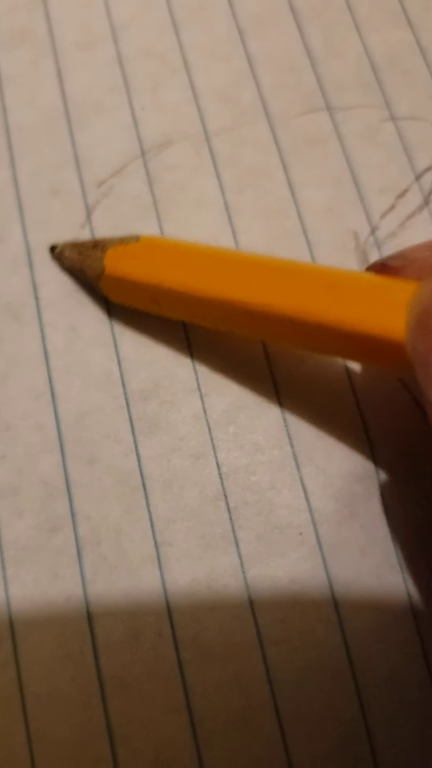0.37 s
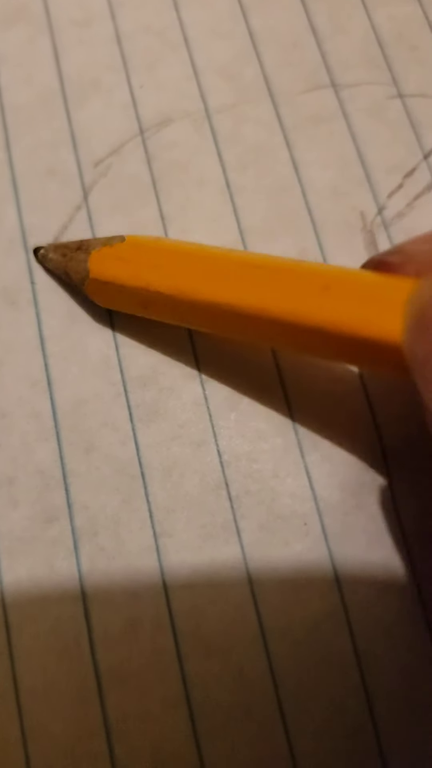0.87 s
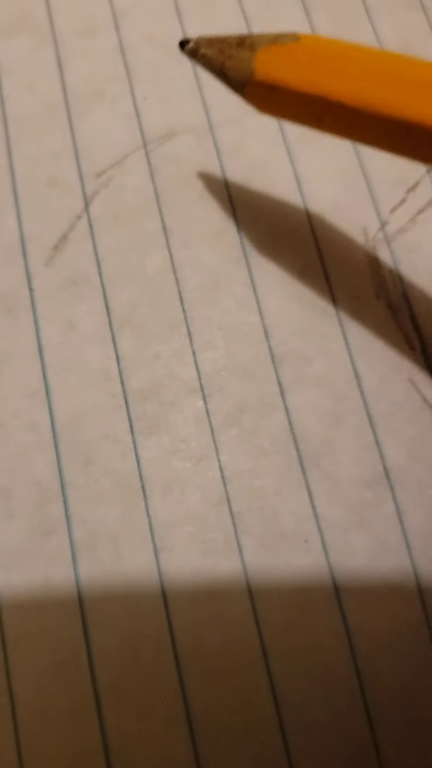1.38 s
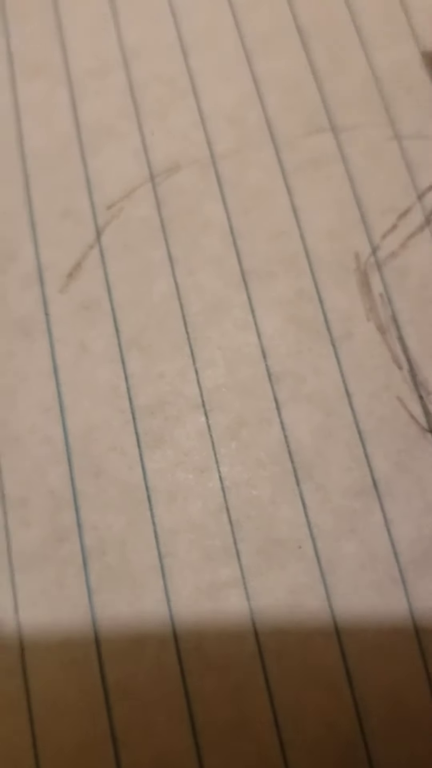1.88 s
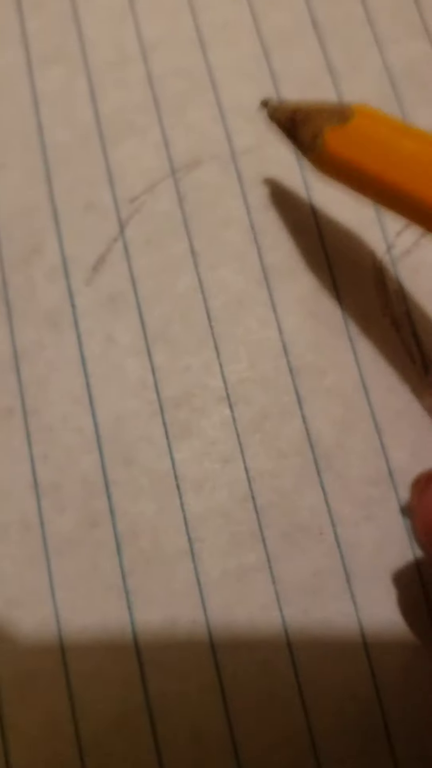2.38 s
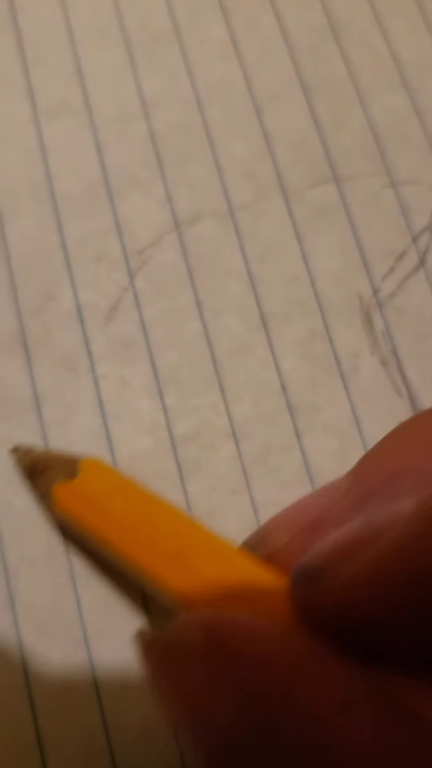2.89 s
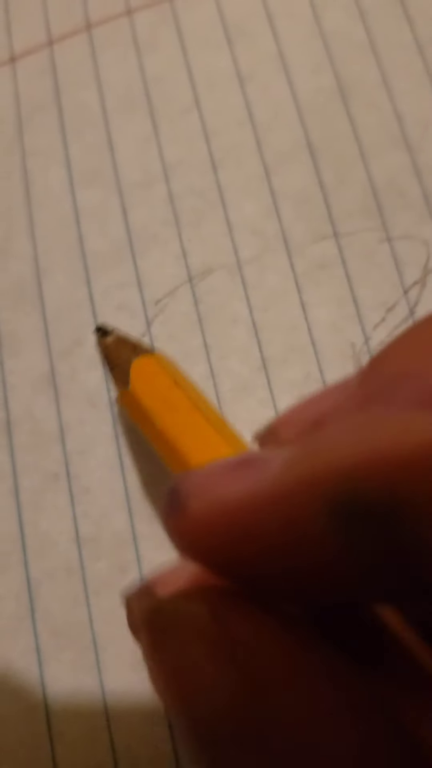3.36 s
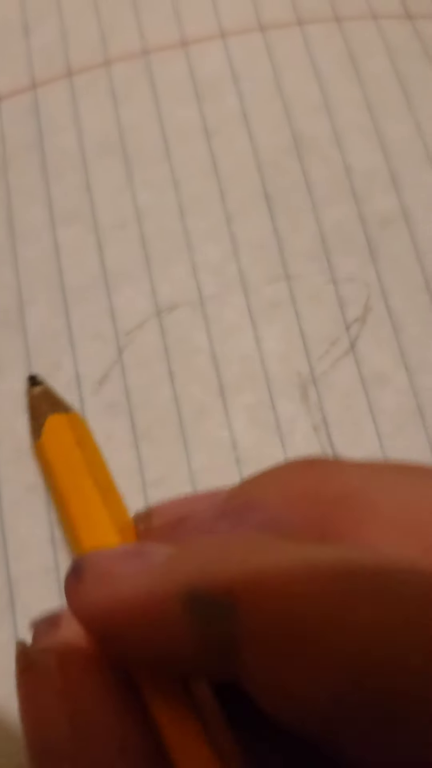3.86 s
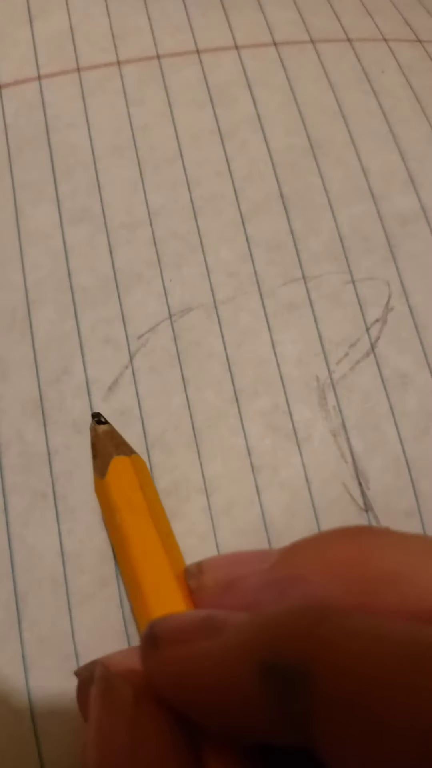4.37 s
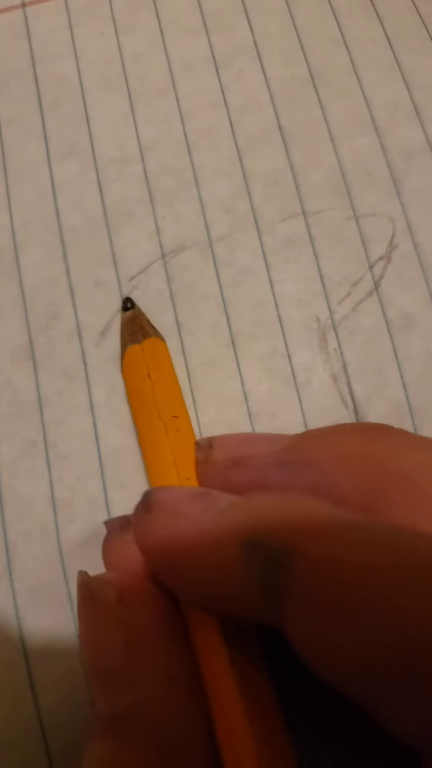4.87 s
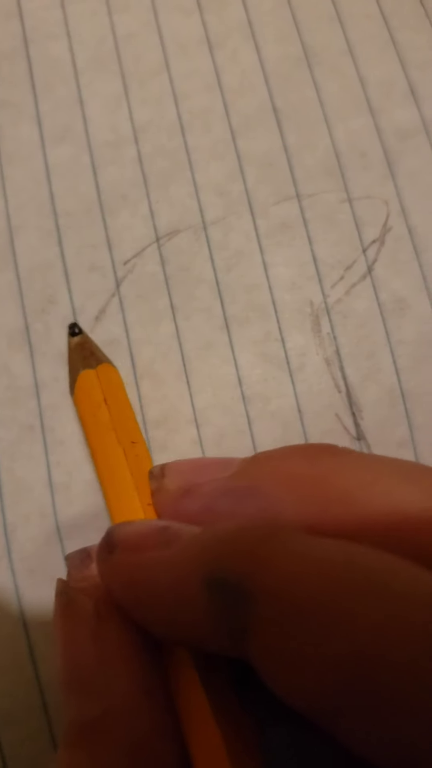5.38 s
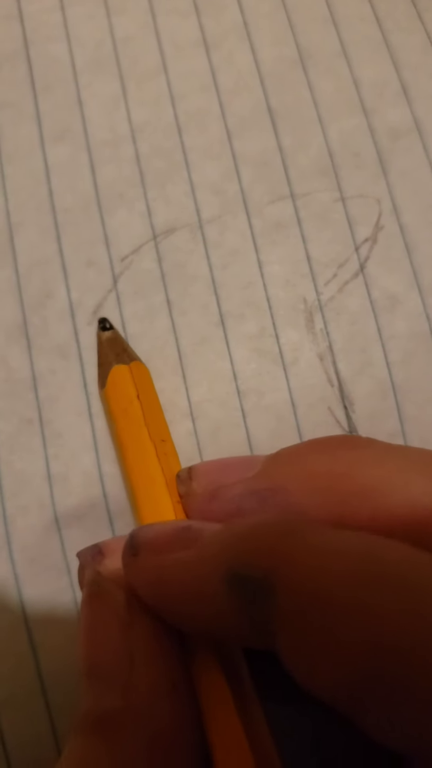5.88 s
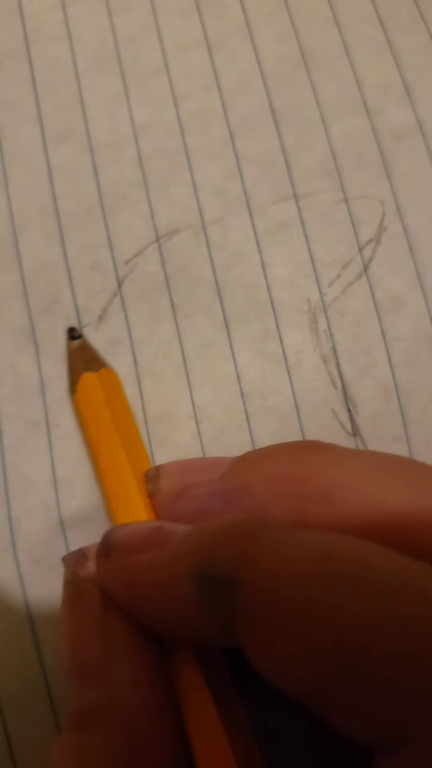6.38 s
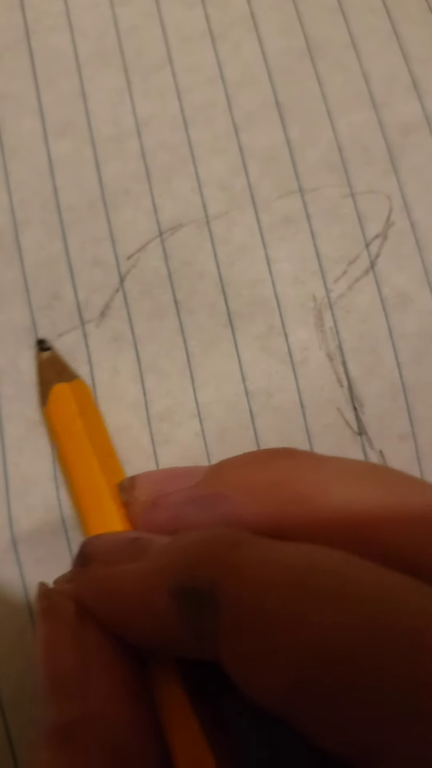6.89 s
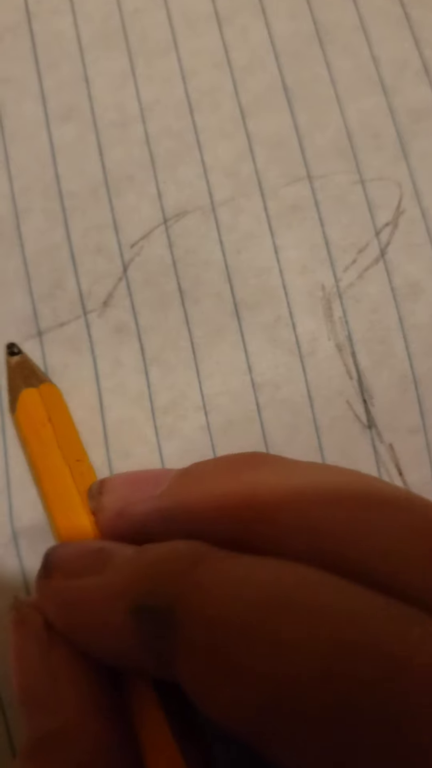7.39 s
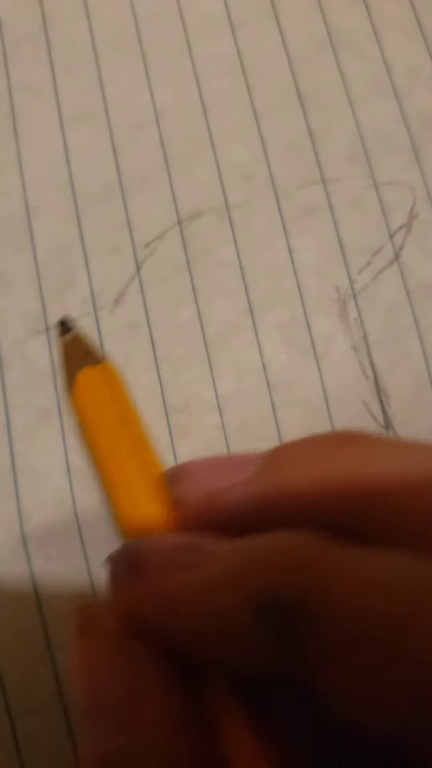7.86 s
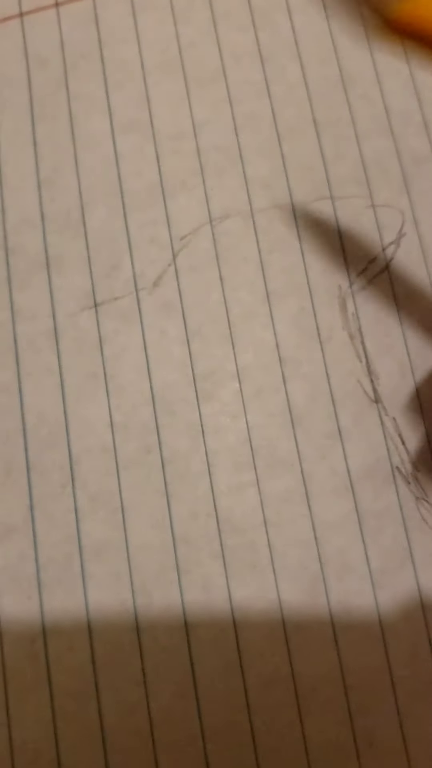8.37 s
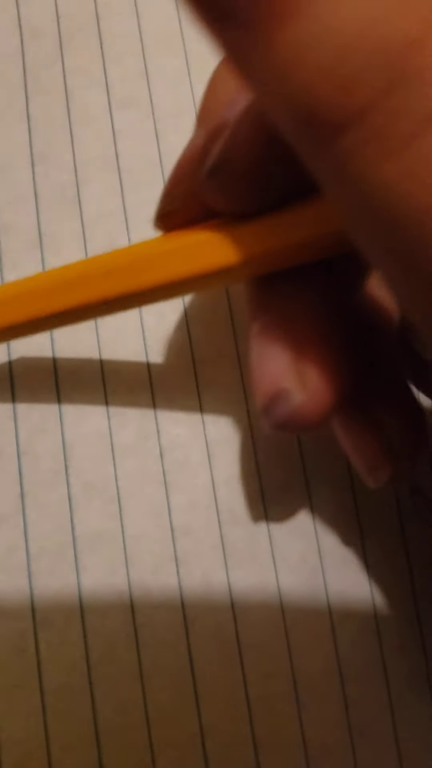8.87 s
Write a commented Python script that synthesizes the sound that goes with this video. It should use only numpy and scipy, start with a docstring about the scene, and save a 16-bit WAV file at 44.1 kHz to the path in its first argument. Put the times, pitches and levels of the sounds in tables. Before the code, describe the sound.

In a quiet indoor room, rapid dry pencil strokes give way to sparse light brushing and little wooden taps. A burst of hollow knocks and creaking from the hand regripping the phone stands out far louder than the writing. Near silence follows, then another run of brisk scratches, a hard pencil tick, and a few faint hand rustles. Close, handheld stereo pickup, leaning left, with soft low background rumble.

```python
"""A wooden pencil draws short, quick strokes on notebook paper (bursts of tiny clicks), then lighter ones.
From about 3.2 to 4.6 s fingers shift their grip on a phone case: knocks and creaks set its parts ringing,
mostly near the left of two unlike microphones. Firmer strokes return from about 6 s, and a sharp tick falls
at 8 s. The point ticks on the pad now and then (short contacts ring the wood); shaped noise
makes the quiet rumble of the room throughout."""
import sys
import numpy as np
from scipy import signal
from scipy.fft import rfft, irfft
from scipy.io import wavfile

SR = 44100
rng = np.random.default_rng(int(sys.argv[2]) if len(sys.argv) > 2 else 0)


def put_to_file(sound):
    """Save the sound as 16-bit audio at rate SR, in the file named by the first command-line argument."""
    columns = np.atleast_2d(sound).T  # one column per channel
    safe = np.clip(columns, -1, 1)
    whole_steps = np.round(safe * 32767)
    wavfile.write(sys.argv[1], SR, whole_steps.astype(np.int16))


def ratio(d):
    """dB to gain"""
    e = np.asarray(d, float) / 20
    return 10 ** e


N = 407925
REGRIP_S = 3.7   # the phone is held anew, which changes its ringing and the path from the page


def rms_one(x):
    """Scales a sound to an rms level of 1."""
    return x / np.sqrt(np.mean(x ** 2) + 1e-20)


def at_hz(points, column=1):
    """Reads a spectrum table at every frequency of the whole-length transform."""
    hz = np.maximum(np.arange(N // 2 + 1) * SR / N, 1)
    points = np.array(points)
    return np.interp(np.log(hz), np.log(points[:, 0]), points[:, column])


def drift(rate_hz):
    """Slow random wandering with spread 1, made at every 40th sample and joined by lines."""
    r = np.exp(-80 * np.pi * rate_hz / SR)
    noise = rng.standard_normal(N // 40 + 2002)
    slow = signal.lfilter([1], [1, -2 * r, r * r], noise)[2000:]   # skip the filter's start-up
    return np.interp(np.arange(N) / 40, np.arange(len(slow)), rms_one(slow))


def grains(per_s, spread_db):
    """Random clicks of uneven size and sign, with an rms level of 1."""
    sizes = ratio(spread_db * np.minimum(rng.exponential(1, N), 4))
    signs = rng.choice([-1, 1], N)
    return rms_one(sizes * signs * (rng.random(N) < per_s / SR))


def ring(clicks, hz, t60):
    """Each click starts a sine, of height 1 for a unit click, that falls by 60 dB in t60 seconds."""
    r, w = ratio(-60 / (t60 * SR)), 2 * np.pi * hz / SR
    return signal.lfilter([0, np.sin(w)], [1, -2 * r * np.cos(w), r * r], clicks + 1e-18)


def cut(x, hz, kind):
    """A gentle filter that keeps the high, low or band part of a sound."""
    return signal.sosfilt(signal.butter(2, hz, kind, fs=SR, output="sos"), x)


def swell(start, length, edge_db, bluntness, bite=1):
    """Level in dB of a movement that speeds up, holds and slows; edge_db down at its ends when bite is 1.
    A bite over 1 sharpens the start and draws out the end."""
    first = max(int((start - length) * SR), 0)
    last = min(int((start + 2 * length) * SR), N)
    place = 2 * (np.arange(first, last) / SR - start) / length - 1   # -1 at the start, 1 at the end
    distance = np.where(place < 0, -place * bite, place / bite)
    return slice(first, last), -edge_db * distance ** bluntness


def room():
    """Steady rumble and hiss from shaped noise, alike on both sides only in the bass, wavering a little."""
    # room tone; columns: pitch_hz, left_level (dB per Hz), right_level (dB per Hz)
    tone = [(25, -84, -87), (34.8, -83, -69.5), (47.4, -62, -64.5), (77.4, -68, -67.5), (95, -71, -77),
            (119.3, -68, -70), (211, -75, -77), (332, -81.5, -82.5), (593, -87.5, -88.5), (812, -86.5, -88),
            (1260, -97, -103), (1795, -92, -100), (2240, -99, -106), (3070, -108, -111), (4700, -116, -121),
            (8850, -121, -127), (15300, -117, -124)]
    # how alike left and right are; columns: pitch_hz, likeness (1 = the same, 0 = unrelated)
    likeness = [(60, 1), (150, 0.96), (380, 0.91), (950, 0.024), (2380, -0.13), (5980, -0.16),
                (15000, 0.18)]
    alike = np.clip(at_hz(likeness), -1, 1)
    mid, side = rfft(rng.standard_normal((2, N)))
    both = np.sqrt(1 + alike) * mid + np.sqrt(1 - alike) * side * [[1], [-1]]
    colour = ratio([at_hz(tone, column=1), at_hz(tone, column=2)]) * np.sqrt(SR) / 2
    return irfft(both * colour, N) * ratio(0.7 * drift(3))


def ticks():
    """A tick rings the wood of the pencil and snaps in the treble; a long contact rattles and sounds duller.
    The same means make one faint smear just ahead of the loud knock."""
    # pencil point and paper ticks, but the row at 3.179 s is a faint smear just ahead of the loud knock;
    # columns: start_s, level_db, treble_snap_db (relative to level),
    # left_minus_right_db, contact_ms (fading time of the contact)
    tick_list = [(1.2994, -69, 22, 15, 0.25), (1.48, -44.5, 5, 29.5, 0.87), (1.589, -46.5, -3, 21, 0.34),
                 (1.68, -47.5, -8, 13, 1.7), (2.4846, -40.5, 5, 8, 0.55), (2.585, -59, 24, 4, .3),
                 (3.02, -50.5, 10, 14, .3), (3.179, -43, -10, 5, 1.8), (3.882, -40, -18, 4, 4.1),
                 (4.908, -49, -20, 9, 3.2), (5.264, -43, -15, 2, 4.3), (5.3995, -39, -22, 3, 3.8),
                 (6.286, -41, -18, -2, 4.4), (7.144, -39.5, -4, 3, 4.4), (7.2848, -47, 4, 14, .3),
                 (7.83, -52, 10, 5, .3), (7.98, -46.5, -16, 8, 11), (8.0252, -24.5, -22, 6, 0.54),
                 (8.044, -32, -18, -1, 4.8), (8.227, -34.5, -8, -3, 1.8), (8.268, -42.5, -14, 11, 3.2),
                 (9.226, -42, -18, 1, 14)]
    # what the wood rings with; columns: pitch_hz, level_db (relative, before dulling), t60_s
    wood_modes = [(720, -7, 0.0053), (1440, -11.5, 0.007), (1880, -8, 0.0062), (2530, -7, 0.0027),
                  (3870, -5.5, 0.0015)]
    dulling_db = -1.0   # per octave above 2 kHz, for each doubling of the contact beyond 1 ms
    alike = 0.67   # share of the contact noise, by power, that both sides have in common
    length = np.arange(1500)
    out = np.zeros((2, N + 1500))
    for start, level_db, snap_db, pan_db, contact_ms in tick_list:
        common, unlike = rng.standard_normal((2, 1500))
        noise = np.sqrt(alike) * common + np.sqrt(1 - alike) * unlike * [[1], [-1]]
        force = 0.2 * noise * np.exp(-length / (contact_ms * SR / 1000))
        force[:, 0] = min(0.3 / contact_ms, 1)   # a short contact starts hard
        wood = 0
        for hz, mode_db, t60 in wood_modes:
            dull_db = dulling_db * np.log2(hz / 2000) * np.log2(max(contact_ms, 1))
            wood = wood + ratio(mode_db + dull_db) * ring(force, hz, t60)
        wood = cut(wood, [500, min(2200 + 2500 / contact_ms, 12000)], "band")
        tick = wood + ratio(snap_db) * cut(force, 6000, "high")
        sides_db = [[level_db + pan_db / 2], [level_db - pan_db / 2]]
        out[:, round(start * SR) + length] += ratio(sides_db) * tick
    return out[:, :N]


def case():
    """Finger snaps and stick-slip creeping ring the same parts of the case.
    A snap is a short burst of contacts, duller than a slip."""
    # fingers snapping on the case; columns: start_s, level_db (before knock_db),
    # thud_db (relative to level), crack_db (relative to level)
    knock_list = [(3.1963, -29, -4, -4), (3.1993, -3.5, -6.5, -16), (3.205, -19.5, -1, -30),
                  (3.2418, -19.5, 9.5, -11), (3.269, -39, 3, -20), (3.507, -32, 15, -12),
                  (3.515, -17.5, 7, -10.5), (3.579, -28, 14, -24), (3.596, -31.5, 20.5, -12),
                  (3.627, -27, 14.5, -17), (3.639, -26.5, -22, -5), (3.747, -35.5, 12.5, -9),
                  (3.758, -38, 11, -28), (4.037, -18, -8.5, -12), (4.071, -29.5, -4, -18),
                  (4.089, -34, 2, -15), (4.25, -26, -15, -20), (4.2628, -20, -20, -24),
                  (4.2675, -19.5, -20, -14), (4.285, -30, -5, -4), (4.2924, -24, 2, -9),
                  (4.313, -30, 5, -10), (4.35, -37, -2, -20), (4.463, -30, -1.5, -21),
                  (4.486, -38.5, -2, -16), (4.558, -38, -3, -16), (4.565, -40.5, 5, -17)]
    # fingers creeping over the case; columns: start_s, length_s, level_db (before creak_db),
    # thud_db (relative to level), crack_db (relative to level)
    creak_list = [(3.224, 0.034, -49, 10, -28), (3.24, 0.057, -38.5, 7, -11.5),
                  (3.352, 0.046, -52.5, 8, -22), (3.396, 0.067, -35, 7, -27),
                  (3.5, 0.026, -31.5, 11.5, -15), (3.569, 0.05, -32.5, 6.5, -13),
                  (3.593, 0.029, -31, -9, -1), (3.611, 0.025, -19, -6, -10.5),
                  (3.752, 0.02, -56.5, 8.5, -25), (4.067, 0.012, -44, 5, -22),
                  (4.213, 0.047, -45.5, 3, -16), (4.246, 0.034, -28.5, -9.5, -9.5),
                  (4.269, 0.049, -29.5, -6, -20), (4.305, 0.056, -42, 3.5, -9.5),
                  (4.478, 0.067, -49.5, 1, -13), (4.545, 0.029, -46.5, -2.5, -8)]
    # what the case rings with, from low to high; columns of all three: pitch_hz, t60_s,
    # first_grip_left_db, first_grip_right_db, second_grip_left_db, second_grip_right_db
    thud_modes = [(351.5, 0.038, 0, -12, -43, -44), (419, 0.0325, -3, -73, -16, -28),
                  (506, 0.016, -46, -66, 6.5, -1.5)]
    ring_modes = [(1010, 0.011, 4, -23, 2, -1), (1047, 0.014, -20, -25, 3, -2.5),
                  (1240, 0.0055, 7.5, -28, -34, -17), (1630, 0.0068, 8, -44, -2.5, -4),
                  (1955, 0.0057, 1, -19, 1.5, 2)]
    crack_modes = [(2690, 0.0046, 8.5, -32, 6, -10), (3450, 0.0022, 9.5, -9, -12, 9),
                   (4300, 0.0044, 0.5, -18, -16, 10.5), (4920, 0.0031, 2, -22, -29, 6.5),
                   (6900, 0.0013, -6, -4, -22, 10.5)]
    knock_db, creak_db = -4.0, -23.0   # overall levels
    contact_s = 0.0016   # fading time of the burst of contacts
    snap_db_per_octave = -2.0   # above 2800 Hz
    unlike_db = 1.5   # each snap strikes each mode a little differently
    body_lag_s = 0.001165   # the nail cracks first; ring and thud follow as the flesh lands

    t, out = np.arange(N) / SR, np.zeros((2, N))
    knocks = np.transpose(knock_list)
    at = np.round(knocks[0] * SR).astype(int)
    burst = np.exp(-np.arange(200) / (contact_s * SR))
    pull = np.zeros((4, N))   # rows 1 to 3 drive ring, thud and crack
    for start, length, level_db, thud_db, crack_db in creak_list:
        near, shape_db = swell(start, length, edge_db=15.0, bluntness=2.84)
        pull[1:, near] += ratio(level_db + shape_db + np.array([[0], [thud_db], [crack_db]]))
    slips = grains(3500, 2.8) * ratio(2.75 * drift(77.4))   # slips come in clumps

    # column, modes, band edges in Hz, gain multiplied in once more at each next mode;
    # below zero, it flips the sign from mode to mode: ring on the right only, crack on both sides
    families = ((1, ring_modes, [964, 1813], [[0.98], [-0.94]]),
                (2, thud_modes, [258, 820], 1),
                (3, crack_modes, [1630, 5750], -1.01))
    for column, modes, edges_hz, flip in families:
        creep = slips * pull[column] * ratio(creak_db)
        lag = 0 if column == 3 else round(body_lag_s * SR)
        family_db = knocks[1] + knock_db
        if column > 1:
            family_db = family_db + knocks[column]
        family = np.zeros((2, N))
        for k, (hz, t60, *gains_db) in enumerate(modes):
            dull_db = snap_db_per_octave * max(np.log2(hz / 2800), 0)
            blows = np.zeros(N)
            blows[at + lag] = ratio(family_db + dull_db + unlike_db * rng.standard_normal(len(at)))
            contact = np.eye(200)[0] + 0.08 * burst * rng.standard_normal(200)
            snaps = signal.fftconvolve(blows, contact)[:N]
            sound = ring(creep + snaps, hz, t60)
            first, second = ratio(np.reshape(gains_db, (2, 2, 1)))
            family += np.where(t < REGRIP_S, first, second) * sound * np.power(flip, k)
        # soft skin excites neither deep bass nor high treble
        family = cut(family, edges_hz, "band")
        for _ in range(2):
            family = cut(family, edges_hz[1] * 2, "low")
        out += family
    return out


def port_colour(x, port, patchy_db=1.6):
    """The colour that a microphone port gives, grip by grip; as the hand moves, bands brighten and dull."""
    first, second = (rms_one(irfft(rfft(x) * ratio(at_hz(port, column=k)), N)) for k in (1, 2))
    spectrum = rfft(np.where(np.arange(N) < REGRIP_S * SR, first, second))
    place = np.linspace(0, 11, num=len(spectrum))   # overlapping bands about 2 kHz apart
    out = np.zeros(N)
    for k in range(9):
        band = irfft(spectrum * np.clip(1 - np.abs(place - k), 0, 1), N)
        out += ratio(patchy_db * drift(6.8)) * band
    return out


def scratch():
    """Paper fibres catch the point thousands of times a second; each stroke swells and fades with its speed."""
    # graphite or skin dragged over paper; columns: start_s, length_s, left_treble_db
    strokes = [(-0.03, 0.089, -51), (0.131, 0.075, -51.5), (0.257, 0.11, -46.5), (0.424, 0.081, -48),
               (0.552, 0.077, -48.5), (0.701, 0.089, -51), (0.828, 0.07, -46), (0.954, 0.074, -47),
               (1.083, 0.078, -52), (1.186, 0.076, -63), (1.3, 0.064, -64.5), (1.38, 0.064, -58.5),
               (1.534, 0.14, -66.5), (1.792, 0.19, -61.5), (1.946, 0.22, -70.5), (2.115, 0.16, -62.5),
               (2.27, 0.12, -71.5), (2.482, 0.11, -70), (2.674, 0.094, -60.5), (2.803, 0.14, -54.5),
               (2.992, 0.076, -67.5), (3.184, 0.13, -55.5), (3.408, 0.36, -56), (3.84, 0.21, -55.5),
               (4.568, 0.1, -61), (4.79, 0.051, -72), (4.977, 0.056, -64.5), (5.03, 0.16, -64),
               (5.205, 0.19, -68), (6.094, 0.12, -58), (6.28, 0.083, -66.5), (6.402, 0.13, -54.5),
               (6.593, 0.097, -58), (6.747, 0.13, -51), (6.923, 0.092, -51.5), (7.085, 0.11, -52.5),
               (7.267, 0.067, -58.5), (7.384, 0.097, -54), (7.578, 0.061, -58.5), (7.704, 0.092, -57.5),
               (7.804, 0.13, -56.5), (7.962, 0.3, -54.5), (8.06, 0.14, -44.5), (8.628, 0.12, -69.5),
               (9.078, 0.15, -60), (9.19, 0.047, -65)]
    # the hand sliding on the page between strokes; columns: time_s, left_treble_db
    rustle_points = [(0, -76), (1.2, -75), (1.75, -71), (2.4, -76.5), (3.1, -81), (3.4, -64), (4.08, -75.5),
                     (4.45, -76), (5.2, -79), (5.55, -85), (6.05, -106.5), (6.5, -71), (8.3, -68.5),
                     (8.5, -102), (9.0, -76), (9.25, -63)]
    # how far the point is from the left port, as treble balance; columns: time_s, right_minus_left_db
    point_place = [(0, -12), (.5, -23), (1.25, -23), (1.42, -4.5), (2.5, 2.5), (3.0, -13.5), (3.2, -3.5),
                   (4.6, -2), (7.4, -6), (8.0, -8.5), (8.13, -15.5), (8.27, -10), (9.25, -8)]
    # colour of the scratch at each microphone port (relative levels);
    # columns of both: pitch_hz, first_grip_db, second_grip_db
    left_port = [(998, 11, 13.5), (1720, 5, 8.5), (2480, 3, 6), (3530, -4.5, 2), (4100, 3.5, 3.5),
                 (5160, 0, 3.5), (6000, -0.5, -1), (7750, 4.5, 3.5), (8670, -2, -2.5), (10900, 3, 6),
                 (12560, 3.5, 2), (13600, 10.5, 7), (16300, 7, 13.5)]
    right_port = [(1210, -40, 5.5), (1730, -35.5, 15), (2400, -3, 9), (3400, -2, 1), (4130, 8.5, 8.5),
                  (5060, 3, 2.5), (6470, -11, 4), (6840, -31.5, 8.5), (7570, -1, -10), (9100, -27, -0.5),
                  (10600, -8, -3), (12000, -8, -2), (13960, -17.5, -13), (15180, -13, -6)]
    split_hz = 5500   # body below, treble above, at the left port
    rustle_body_db, rustle_right_db = 0.0, -4.5   # relative to the rustle's left treble
    # body against treble: less near the left port, less in strong strokes
    body_base_db, body_per_place, body_per_level = 1.5, 0.52, -0.26
    middling_db = -60   # treble level of a middling stroke

    rustle = ratio(np.interp(np.arange(N) / SR, *np.transpose(rustle_points))) ** 2
    power = rustle * ratio([[0], [rustle_body_db], [rustle_right_db]]) ** 2   # rows: treble, body, right
    for start, length, level_db in strokes:
        right_db = np.interp(start + length / 2, *np.transpose(point_place))
        body_db = body_base_db + body_per_place * right_db + body_per_level * (level_db - middling_db)
        near, shape_db = swell(start, length, edge_db=8.0, bluntness=2.9, bite=1.076)
        power[:, near] += ratio(level_db + shape_db + np.array([[0], [body_db], [right_db]])) ** 2
    treble, body, right = np.sqrt(power) * ratio(1.2 * drift(26))   # uneven pressure

    at_left, at_right = (port_colour(cut(grains(7000, 1.98), 870, "high"), port)
                         for port in (left_port, right_port))
    left_treble = treble * cut(at_left, split_hz, "high")
    left_body = body * ratio(10.0) * cut(at_left, split_hz, "low")
    left = left_treble - left_body   # the minus joins the two bands in phase
    return np.array([left, right * at_right])


def scene():
    """The room, the ticks, the phone case and the pencil strokes together."""
    return room() + ticks() + case() + scratch()


def top_cut(x):
    """Nothing passes above the cut-off."""
    return signal.sosfilt(signal.butter(12, 16510, fs=SR, output="sos"), x)


def record(dry):
    """The loudest peaks bend smoothly towards a limit of 1.1, then the top above 15.78 kHz is cut."""
    rounded = dry / (1 + (dry / 1.1) ** 6) ** (1 / 6)
    top = signal.ellip(10, 0.5, 60, 15780, fs=SR, output="sos")
    mix = signal.sosfilt(top, rounded)
    return top_cut(mix)


dry = scene()
out = record(dry)
put_to_file(out)
```